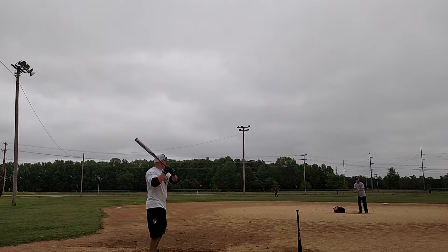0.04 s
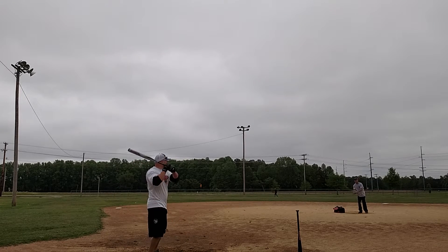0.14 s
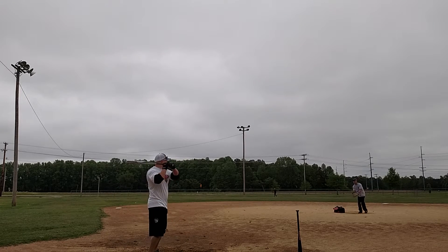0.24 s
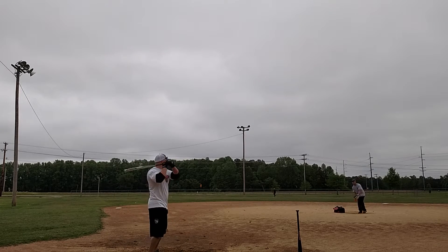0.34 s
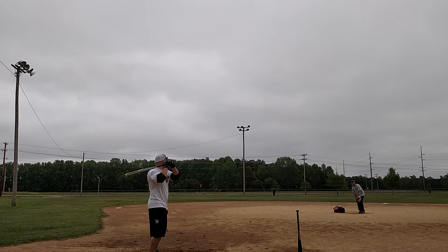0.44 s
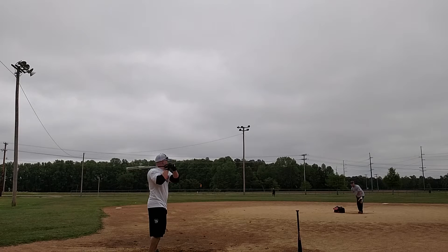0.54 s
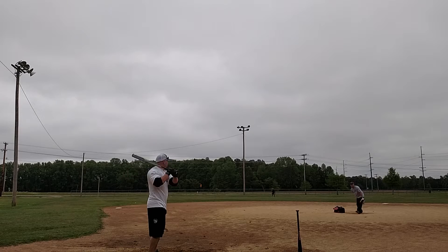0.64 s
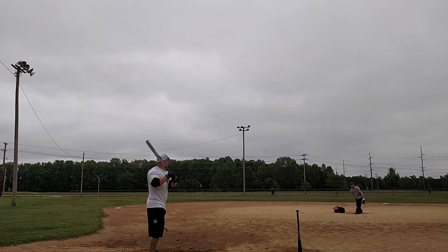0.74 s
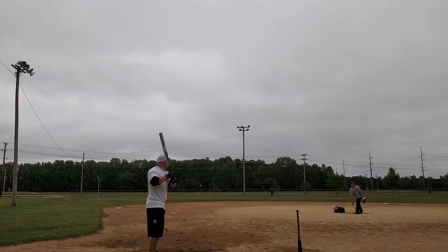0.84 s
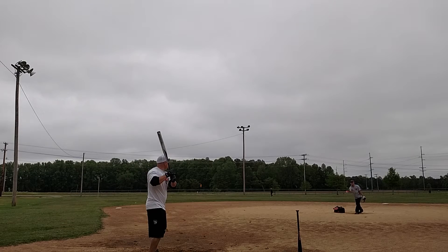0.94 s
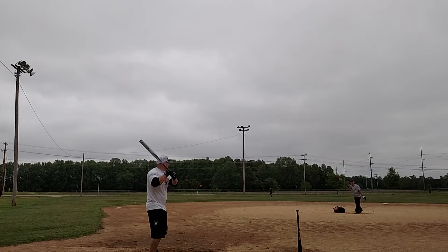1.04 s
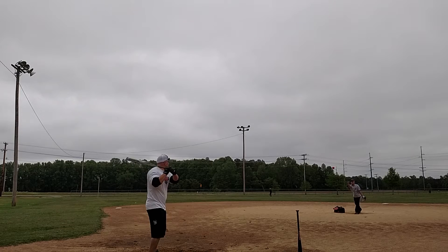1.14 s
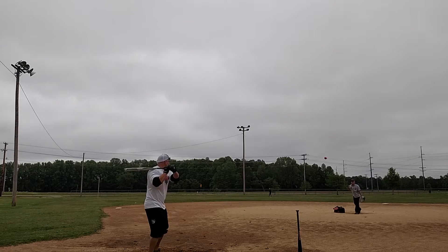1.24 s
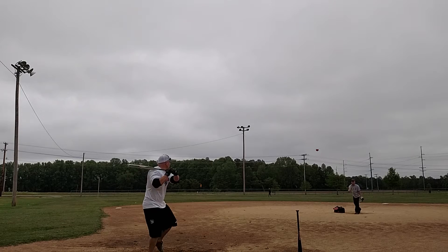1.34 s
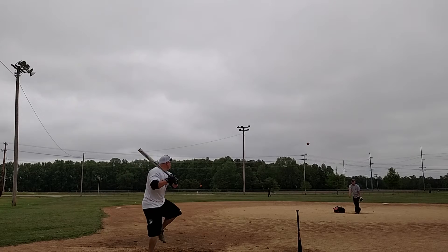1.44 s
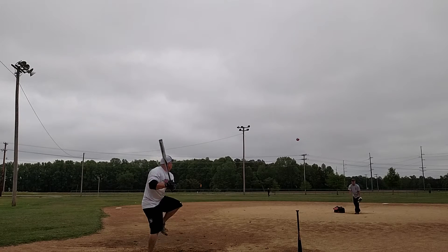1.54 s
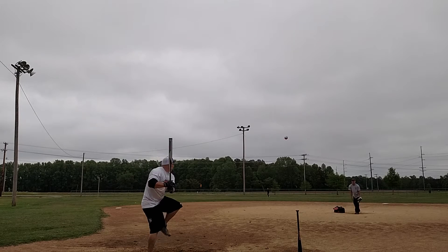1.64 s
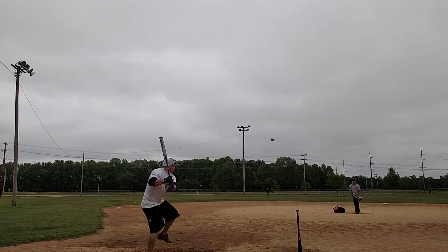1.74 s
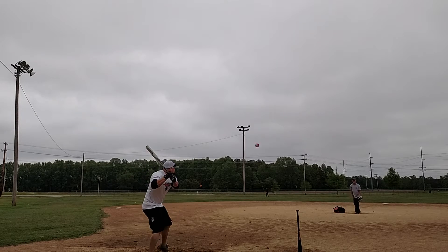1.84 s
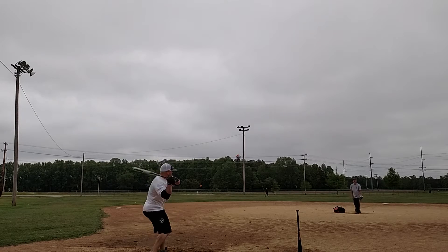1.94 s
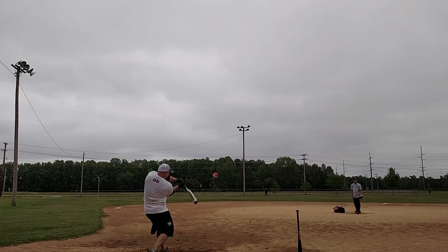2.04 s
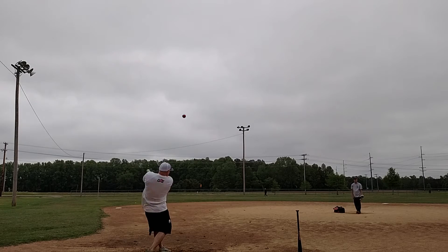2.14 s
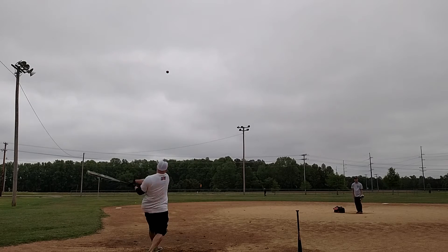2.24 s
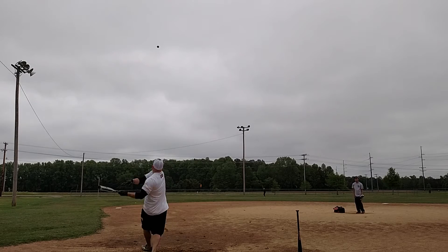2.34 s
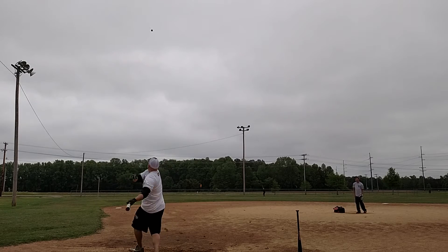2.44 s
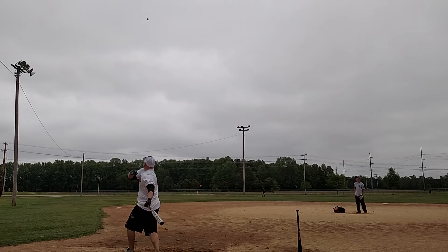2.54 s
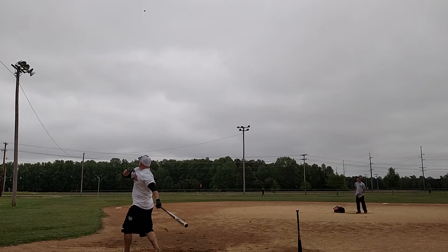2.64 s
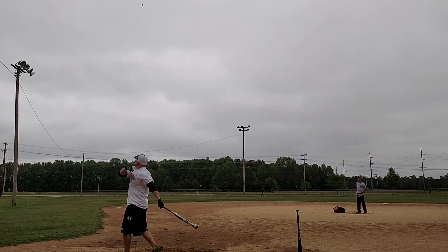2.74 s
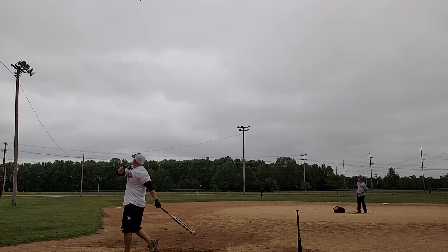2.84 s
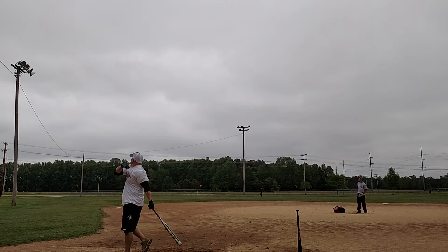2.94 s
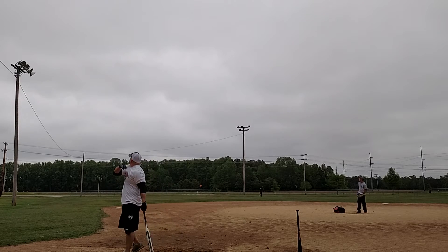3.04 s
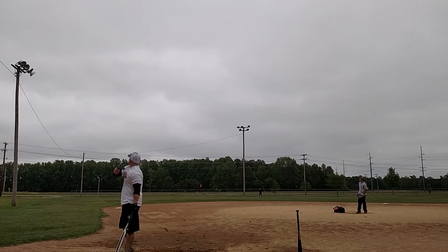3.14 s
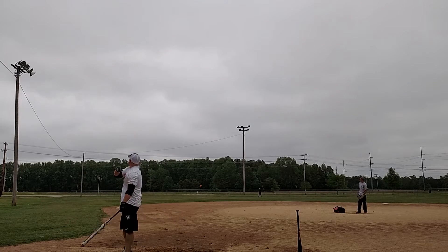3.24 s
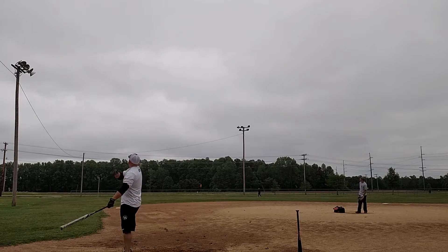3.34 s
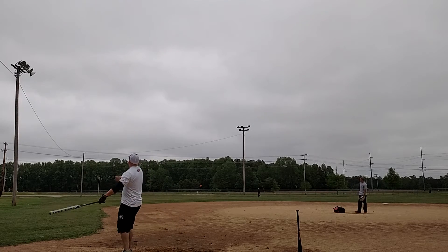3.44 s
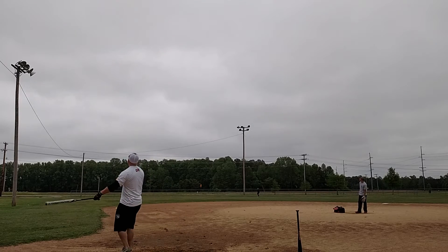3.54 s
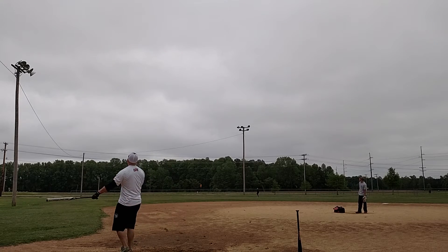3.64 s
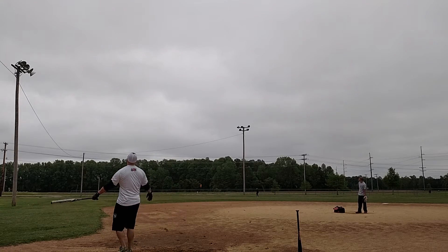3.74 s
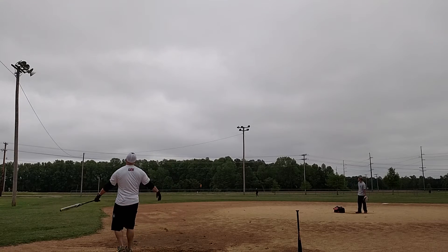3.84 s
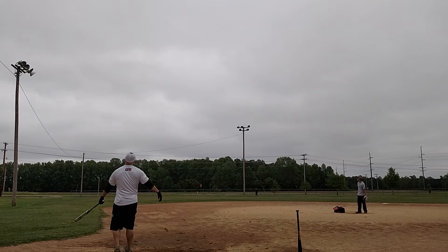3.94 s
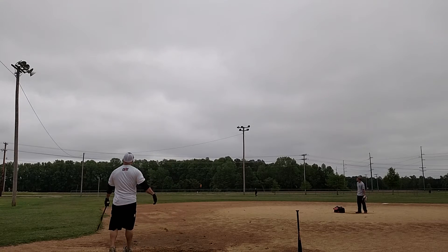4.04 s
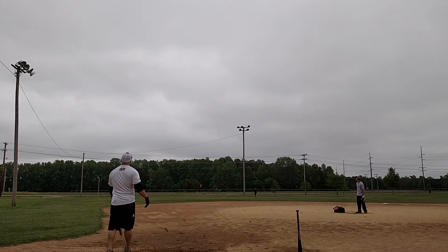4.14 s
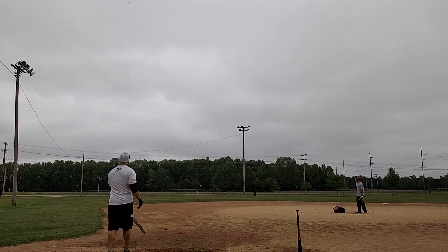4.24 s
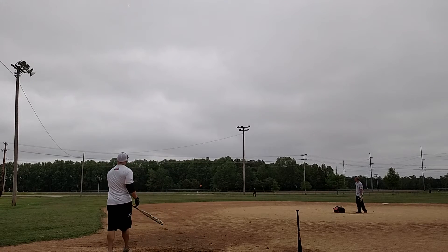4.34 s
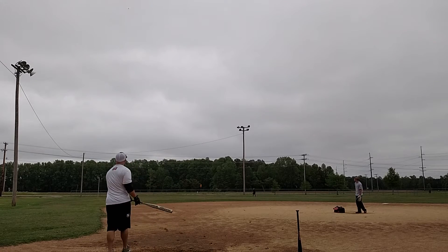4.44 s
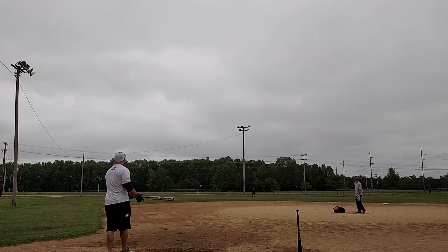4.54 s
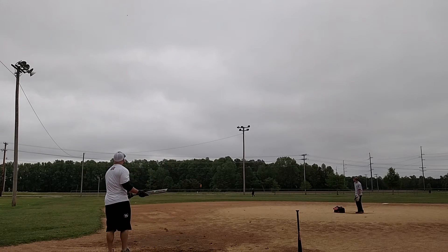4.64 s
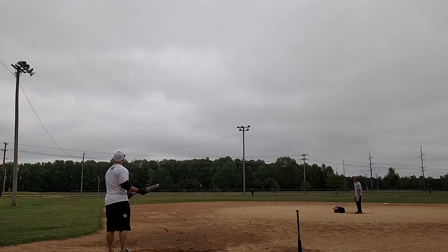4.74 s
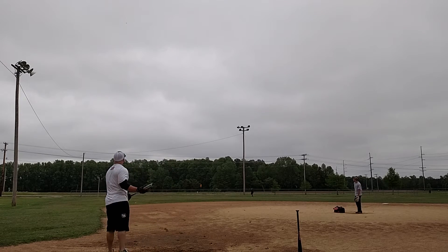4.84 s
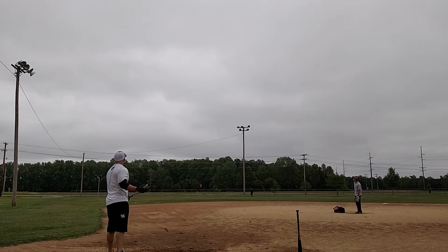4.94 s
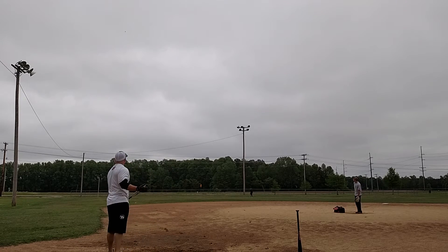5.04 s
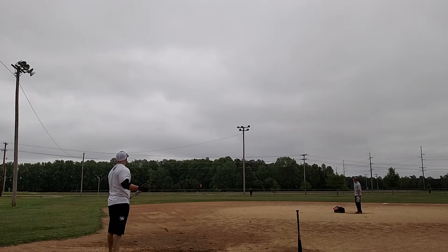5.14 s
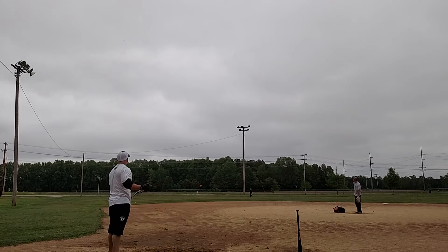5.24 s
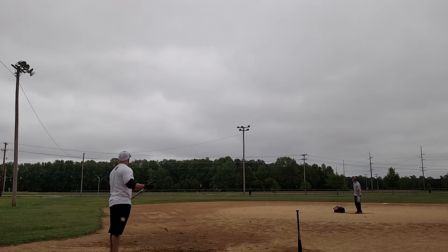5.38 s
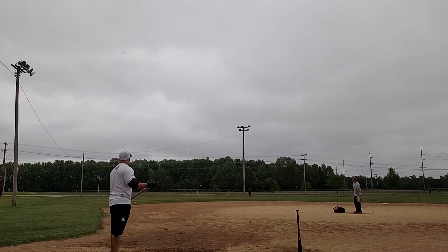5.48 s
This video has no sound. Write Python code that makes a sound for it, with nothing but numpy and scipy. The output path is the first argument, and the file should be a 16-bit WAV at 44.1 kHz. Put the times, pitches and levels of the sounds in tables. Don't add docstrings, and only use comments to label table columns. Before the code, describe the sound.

One sharp, overloaded bat crack on a softball rings over an open field, amid bird calls, foot scuffs in dirt and a low distant hum.

```python
import sys
import numpy as np
from scipy import signal
from scipy.fft import rfft, irfft
from scipy.io import wavfile
from scipy.ndimage import uniform_filter1d

SR = 44100
rng = np.random.default_rng(int(sys.argv[2]) if len(sys.argv) > 2 else 0)


def bounce(signal):
    frames = np.transpose(np.atleast_2d(signal))
    limited = np.clip(frames, -1, 1)
    pcm = np.round(limited * 32767).astype(np.int16)
    wavfile.write(sys.argv[1], SR, pcm)


def boost_factor(decibels):
    exponent = np.asarray(decibels, float) / 20
    return 10 ** exponent


N = 242991

# frequency in Hz, density in dB per Hz.
HUM_SPECTRUM = [(12, -34.5), (20, -7.5), (53, -5.5), (130, 0.5), (222, -0.5), (293, -5), (367, -11),
                (802, -19.5), (897, -18.5), (1480, -20.5), (1710, -22), (2200, -23.5), (4300, -32),
                (14700, -46), (16000, -55.5)]
HUM_DB = -50.5

# start in seconds, length in seconds, start pitch in Hz, level in dB.
RISING_NOTES = [(.149, 0.052, 2180, -62.5), (.393, 0.028, 1980, -65), (.532, 0.031, 1950, -62.5),
                (.678, 0.026, 2030, -63), (.738, 0.039, 2330, -71), (.834, .022, 2010, -66),
                (.972, 0.02, 1990, -65), (1.31, .024, 2330, -64), (1.112, .022, 1930, -64),
                (1.56, 0.14, 1600, -69), (5.236, 0.028, 2340, -68), (5.474, 0.021, 2310, -63)]
FALLING_NOTES = [(.066, .03, 1960, -65), (.172, 0.018, 2400, -66), (.204, 0.021, 2260, -64),
                 (.346, 0.026, 1950, -62), (.556, .03, 2950, -69), (.626, 0.027, 1990, -61),
                 (.7, 0.034, 2900, -68), (.804, .018, 2050, -64), (1.13, 0.02, 2300, -65),
                 (2.885, .035, 2580, -71), (3.125, 0.0286, 2600, -73), (3.153, .03, 2850, -80),
                 (4.686, 0.039, 3020, -68), (4.913, .043, 2900, -67), (5.262, 0.015, 2550, -73),
                 (5.325, 0.042, 2990, -65), (5.484, 0.03, 2760, -59)]
HOOKED_NOTES = [(.47, 0.025, 2760, -66), (.858, .022, 3200, -70), (1.262, 0.046, 2910, -64),
                (1.422, 0.039, 3000, -61), (1.572, 0.046, 3000, -60.5), (1.735, .04, 2990, -62),
                (1.905, 0.042, 3130, -66), (3.09, .05, 3230, -69), (3.35, .03, 3260, -65)]
SWOOPING_NOTES = [
    (.163, 0.113, 5800, -59),
    (.718, 0.108, 5700, -57.5),
    (1.248, 0.113, 5880, -55),
]
CLIMBING_NOTES = [
    (1.36, 0.12, 2520, -56.5),
    (1.7, 0.139, 2500, -57),
    (3.035, 0.053, 2110, -67),
    (1.483, 0.047, 4400, -69.5),
]
ARCHED_NOTES = [
    (1.553, 0.066, 4650, -71.5),
]
# start in seconds, length in seconds, start pitch in Hz, end pitch in Hz, level in dB.
PEEPS = [(0, 0.071, 1880, 2070, -68), (.075, .028, 2730, 2700, -63), (.423, .02, 2760, 2560, -71),
         (0.568, .035, 1970, 1940, -70), (0.617, 0.032, 2610, 2720, -65), (0.709, .024, 6780, 6520, -72),
         (0.73, 0.029, 6730, 6740, -75), (0.768, .042, 2150, 2030, -64), (.99, .014, 2200, 2050, -66),
         (0.994, 0.027, 2960, 2600, -68), (1.06, 0.053, 1715, 1960, -69), (1.13, .012, 3250, 3400, -70),
         (1.157, 0.032, 2595, 2690, -65), (1.557, 0.036, 4520, 4310, -75), (1.815, .04, 4370, 4530, -76),
         (3.296, 0.051, 2256, 2290, -70.5), (3.4, .085, 3640, 3490, -77), (3.512, .012, 3400, 3520, -67),
         (3.806, 0.044, 7170, 7190, -72.5), (3.811, .012, 4900, 4710, -70.5),
         (3.827, 0.035, 2850, 2850, -63.5), (3.858, .03, 2850, 2830, -71), (4.142, .025, 4960, 5050, -71),
         (4.368, .025, 4900, 4770, -65), (4.5, 0.077, 2370, 2340, -74), (4.866, 0.048, 2650, 2750, -71),
         (4.875, .025, 1700, 1600, -67), (5.03, 0.038, 2000, 2085, -72), (5.271, 0.04, 2090, 2150, -67.5),
         (5.362, .022, 1900, 1930, -73)]
# end pitch over start pitch, late start of glide, levelling out, swell in dB.
RISING = (1.26, 1.2, 1.05, .3)
FALLING = (.8, .95, 1.09, .3)
HOOKED = (0.715, 2.6, 1.5, 0.5)
SWOOPING = (.635, 1.65, 2.6, 22.)
CLIMBING = (1.085, .9, 2.3, 9)
ARCHED = (1.125, .9, 5., -3.)
NOTE_EDGE = 0.49
WARBLE_DB, WARBLE_SHARE = 1.8, 0.004

# share of length, pitch ratio, level in dB, pitch blur in Hz, overtones in dB.
CRY_COURSE = [
    (0, .985, -21, 39.9, -12),
    (.12, 1.005, -10.5, 39.88, -8),
    (.35, 1.012, -10, 44.93, -10),
    (.58, .995, -2.5, 110, -13),
    (.78, .97, -1.5, 160, -11),
    (1, .9, -9, 240, -16),
]
# start in seconds, length in seconds, pitch in Hz, level in dB, hoarseness factor.
CRIES = [
    (-.36, 0.56, 3400, -63.5, 0.7),
    (1.442, 0.55, 3502, -59, 1.48),
    (3.58, 0.52, 3380, -62, 1.0),
    (4.039, 0.53, 3390, -61.5, 1.04),
    (4.42, 0.36, 3350, -68, 1.12),
    (4.78, 0.37, 3404, -63.5, 1.25),
]
# multiple of the pitch, level in dB.
CRY_OVERTONES = [(1.5, -5.5), (2, -6), (2.5, -13.5)]

CHORUS_DB, CHORUS_HZ, CHORUS_SPREAD, CHORUS_S, CHORUS_NOTES = -77, 2450, 0.16, 0.045, 44

# time in seconds, peak in dB, length in seconds.
GUSTS = [
    (0.212, -44, 0.0049),
    (0.273, -42, 0.0094),
    (0.988, -29, 0.0034),
    (1.728, -41, 0.0059),
    (1.885, -42, 0.0047),
    (1.992, -40, 0.0035),
]

# start in seconds, length in seconds, first level in dB, last level in dB, brightness in dB per octave.
SCUFFS = [(0.465, 0.031, -59, -69, -2.5), (0.856, 0.039, -52.5, -64, -5), (1.38, 0.03, -70, -66, 10.5),
          (1.761, 0.064, -64, -62, -1), (2.732, 0.012, -52, -45.5, -1), (2.761, 0.036, -65, -58, -5),
          (3.315, .035, -54, -66, -4.5), (3.487, .09, -55.5, -67, -1.5), (3.59, 0.047, -65, -70, 4),
          (4.103, 0.08, -67, -62, 1.5), (4.191, 0.173, -56, -56.5, 1), (4.381, 0.15, -62, -62, 0.5),
          (4.866, 0.029, -63, -59, -3), (4.901, 0.27, -68, -66, 5.5), (5.167, 0.044, -71, -58, 0.5),
          (5.199, 0.31, -64.5, -68, 1.8)]
# start in seconds, length in seconds, first level in dB, last level in dB, brightness in dB per octave.
STRIDES = [(2.005, 0.052, -50, -49.5, 0.5), (2.06, 0.041, -58, -54.5, -0.5),
           (2.087, 0.014, -52, -42.5, -1.5), (2.106, .018, -45, -44.5, .5), (2.134, 0.024, -59, -57, 0.5),
           (2.152, 0.053, -47.5, -48, .6), (2.205, 0.026, -46, -37, -2.5), (2.243, .085, -46, -55, .5),
           (2.33, 0.39, -63, -68.5, 0), (2.399, 0.041, -51, -59.5, -0.5), (2.436, 0.19, -58, -62, -3)]
# frequency in Hz, density in dB per Hz.
DIRT_SPECTRUM = [(150, -36), (250, -1), (407, -11), (971, -7), (1530, -6), (1700, -8.5), (2620, -6),
                 (11100, -25.5), (14400, -36), (16000, -43.5)]
SET_S, LIFT_S, EDGE_DB = 0.012, 0.021, -10.5

# time in seconds, peak in dB, ring in Hz.
GRIT = [(1.133, -58, 6700), (1.227, -56, 5000), (2.256, -41, 8200), (2.2664, -40, 8400),
        (2.2774, -43, 6500), (2.2972, -31.5, 3800), (2.305, -40, 5450), (2.3114, -40, 5540),
        (2.319, -47, 7500), (2.3441, -43, 3670), (2.4025, -49, 5200), (2.7275, -44, 3865),
        (2.7725, -48, 3587), (3.489, -48, 5010), (3.601, -51, 4170), (3.6296, -47, 5270),
        (3.8144, -59, 4840), (4.0114, -51, 4830), (4.1203, -49, 5100), (4.509, -52, 3480),
        (4.561, -50, 4900), (4.6637, -47, 4940), (5.101, -47, 3050), (5.1624, -44, 4100),
        (5.166, -45, 4900), (5.2041, -46, 3470), (5.2842, -48, 5460), (5.3456, -46.5, 5320)]

# time in seconds, centre in Hz, level in dB.
SWING_COURSE = [
    (2.1, 60, -55),
    (2.17, 91, -56),
    (2.203, 170, -42),
    (2.222, 230, -46),
    (2.24, 260, -60),
]

HIT_S, HIT_DB, TICK_DB, PUFF_DB = 2.2261, 2.2, 3.5, -23
# frequency in Hz, level in dB, decay by 60 dB in seconds, start as push (1) or pull (-1).
BARREL_MODES = [(670, -10, 0.018, 1), (840, -18, 0.012, -1), (935.5, -22, 0.018, -1),
                (1075, -11.5, 0.043, -1), (1250, -14, 0.018, -1), (1520, -9, 0.0094, -1),
                (1868, 2.5, 0.0074, 1), (2130, -12.5, 0.026, -1), (3000, -19, 0.021, 1),
                (3520, -5, .0105, -1), (4490, -18.5, 0.0064, 1), (4976, -9.5, 0.0069, -1),
                (6350, -15, 0.0075, 1), (7270, -22.5, 0.0066, 1)]
THIN_HZ = 527
# delay in seconds, level in dB.
BOUNCES = [
    (.0022, -20),
    (.0066, -25),
    (.009, -22),
]
BOUNCE_HZ = 2800
# delay in seconds, level in dB, spread in seconds.
ECHOES = [
    (.028, -35, 0.0091),
    (.05, -35.5, 0.011),
    (.095, -39, 0.0083),
    (0.173, -46.5, 0.015),
    (.25, -37.5, .05),
    (.51, -37, 0.017),
]
# frequency in Hz, level in dB.
ECHO_COLOUR = [(300, -13.5), (1000, -2), (1180, 5), (1400, -4.5), (3000, -6), (8000, -13), (16000, -22.5)]
# delay in seconds, frequency in Hz, level in dB, length in seconds.
POSTS = [
    (0.036, 1165, -43, .0045),
    (0.052, 731, -46, .003),
    (0.073, 710, -45, 0.003),
    (.065, 1201, -54, .025),
    (0.094, 1200, -44.5, 0.006),
    (.106, 1170, -49, .007),
    (0.173, 1190, -54, .012),
    (0.266, 1156, -63, .03),
]

# time in seconds, level in dB.
INSECT_COURSE = [
    (3.58, -78),
    (3.76, -74),
    (3.88, -68.5),
    (4.25, -66.5),
    (5.51, -65.5),
]
BEAT_PER_S, MIDWAY_S, AHEAD, SLOWING = 32.3, 4.62, 0.14, 0.9

# time in seconds, level in dB.
CLOTH_COURSE = [
    (4.88, -82),
    (4.96, -70),
    (5.05, -69),
    (5.11, -70),
    (5.2, -82),
]
# frequency in Hz, level in dB.
CLOTH_COLOUR = [(5000, -25), (8000, -3), (10000, 0), (13000, -5), (15500, -6)]

# frequency in Hz, level in dB.
MIC_RESPONSE = [(10, -3), (60, 0), (14000, 0.5), (15450, 0.5), (15650, -25.5), (20000, -42)]
# frequency in Hz, share of the ducking from 0 to 1.
DUCK_SHARE = [(30, 1.02), (250, 1), (600, 0.5), (2000, .35), (6000, 0.2), (14000, 0.3)]
DUCK_DB, GRAB_S, RECOVER_S = -17.5, 0.035, 1.95


def evened(x):
    return x / np.sqrt(np.mean(x ** 2) + 1e-20)


def wander(count, size):
    return evened(uniform_filter1d(rng.standard_normal(count), size=size))


def patches(shape, bands, frames):
    across = uniform_filter1d(rng.standard_normal(shape), size=bands, axis=0)
    return evened(uniform_filter1d(across, size=frames, axis=1))


def read(points, hz):
    f, value = np.transpose(points)
    return np.interp(np.log(hz + 1), np.log(f + 1), value)


def unroll(rows):
    s, *columns = np.transpose(rows)
    t = np.arange(s[0], s[-1], 1 / SR)
    return [t] + [np.interp(t, s, c) for c in columns]


def add(mix, s, sound):
    at = round(s * SR)
    part = mix[max(at, 0):][:len(sound) + min(at, 0)]
    part += sound[max(-at, 0):][:len(part)]


def resonate(x, hz, width):
    turn = np.exp(2j * np.pi * np.cumsum(hz * np.ones(len(x))) / SR)
    r = np.exp(-np.pi * width / SR)
    return 2 * (turn * signal.lfilter([1 - r], [1, -r], x / turn)).real


def coloured(x, points):
    return irfft(rfft(x) * boost_factor(read(points, np.fft.rfftfreq(len(x), 1 / SR))), len(x))


def high_passed(x, hz):
    return signal.sosfilt(signal.butter(2, hz, "high", fs=SR, output="sos"), x)


def field():
    hz, _, z = signal.stft(rng.standard_normal(N), SR, nperseg=1024, noverlap=768)
    z = z * boost_factor(read(HUM_SPECTRUM, hz)[:, None] + 0.96 * patches(z.shape, 8, 10))
    return boost_factor(HUM_DB) * evened(signal.istft(z, SR, nperseg=1024, noverlap=768)[1][:N])


def trees(x, wet_db=-7.5, t60=0.24):
    t = np.arange(9000) / SR
    tail = rng.standard_normal(len(t)) * boost_factor(-60 * t / t60)
    return x + boost_factor(wet_db) * signal.oaconvolve(x, tail / np.linalg.norm(tail))[:N]


def note(s, length, start_hz, db, ratio, late, level_out, swell_db):
    u = np.linspace(0, 1, round(length * SR))
    rate, shift = rng.random((2, 2, 1))
    sway, wobble = np.sin(2 * np.pi * ((40 + 60 * rate) * u * length + shift))
    glide = 1 - (1 - u ** late) ** level_out
    hz = start_hz * (1 + (ratio - 1) * glide + WARBLE_SHARE * wobble)
    level = boost_factor(db + 6.0 - swell_db * (1 - u) + WARBLE_DB * sway)
    return s, level * np.sin(2 * np.pi * np.cumsum(hz) / SR) * signal.windows.tukey(len(u), NOTE_EDGE)


def cry(s, length, pitch_hz, cry_db, hoarse):
    t, hz, db, blur, over_db = unroll([
        (s + u * length, pitch_hz * ratio ** hoarse, cry_db + d, hoarse * blur, over)
        for u, ratio, d, blur, over in CRY_COURSE])
    turns = 2 * np.pi * np.cumsum(hz + 0.63 * blur * wander(len(t), 200)) / SR
    flutter = boost_factor(2.4 * wander(len(t), 600))
    overtones = sum(boost_factor(d) * np.sin(k * turns) for k, d in CRY_OVERTONES)
    return t[0], boost_factor(db + 1) * (np.sin(turns) + boost_factor(over_db) * overtones) * flutter


def birds():
    near, far = np.zeros((2, N))
    for rows, shape in [(RISING_NOTES, RISING), (FALLING_NOTES, FALLING), (HOOKED_NOTES, HOOKED),
                        (SWOOPING_NOTES, SWOOPING), (CLIMBING_NOTES, CLIMBING), (ARCHED_NOTES, ARCHED)]:
        for row in rows:
            add(near, *note(*row, *shape))
    for s, length, start_hz, end_hz, db in PEEPS:
        add(near, *note(s, length, start_hz, db, end_hz / start_hz, 1, 0.89, 0))
    for row in CRIES:
        add(far, *cry(*row))
    return trees(near) + boost_factor(-1.5) * trees(far, wet_db=2.0, t60=0.68)


def chorus():
    out = np.zeros(N)
    for when, pitch, way, size in rng.random((CHORUS_NOTES, 4)):
        ratio, *shape = RISING if way < 0.5 else FALLING
        hz = CHORUS_HZ * (1 + CHORUS_SPREAD * (2 * pitch - 1)) / np.sqrt(ratio)
        length = CHORUS_S * (0.6 + size)
        add(out, *note(when * N / SR, length, hz, CHORUS_DB + 4.0 * size, ratio, *shape))
    return trees(out, wet_db=-1.5, t60=0.49)


def gusts(mix):
    for s, db, length in GUSTS:
        u = np.arange(-0.05 * SR, 0.05 * SR) / SR / length
        add(mix, s - 0.05, -boost_factor(db) * (1 - u ** 2) * np.exp(-u ** 2 / 2))


def scuff(s, length, first_db, last_db, brightness):
    end = s + length
    t, db, tilt = unroll([(s - SET_S, first_db + EDGE_DB, brightness), (s, first_db, brightness),
                          (end, last_db, brightness), (end + LIFT_S, last_db + EDGE_DB, brightness)])
    sand = rng.standard_normal(len(t)) * boost_factor(wander(len(t), 120))
    hz, frames, z = signal.stft(coloured(sand, DIRT_SPECTRUM), SR, nperseg=256)
    octaves = np.log2((hz[:, None] + 200) / 2500)
    z = z * boost_factor(octaves * np.interp(frames, t - t[0], tilt))
    slide = evened(signal.istft(z, SR, nperseg=256)[1][:len(t)])
    return t[0], boost_factor(db) * slide * signal.windows.tukey(len(t), 0.08)


def grit(mix):
    t = np.arange(300) / SR
    tick = boost_factor(-7.0) * np.sin(2 * np.pi * 7500 * t) * boost_factor(-60 * t / 0.0013)
    envelope = boost_factor(-60 * t / 0.0035) * (1 - np.exp(-t / 0.0001))
    for s, db, hz in GRIT:
        add(mix, s, boost_factor(db + 3.5) * (tick + np.sin(2 * np.pi * hz * t) * envelope))


def swing():
    t, hz, db = unroll(SWING_COURSE)
    return t[0], boost_factor(db) * evened(resonate(rng.standard_normal(len(t)), hz, 37.0))


def impact(t):
    ring = sum(np.sign(way) * boost_factor(db - 60 * t / t60) * np.sin(2 * np.pi * hz * t)
               for hz, db, t60, way in BARREL_MODES)
    tick = boost_factor(TICK_DB) * np.sin(2 * np.pi * 3800 * t + 0.28) * np.exp(-t / 0.00011)
    skin = boost_factor(-7.0) * np.sin(2 * np.pi * 10500 * t) * boost_factor(-60 * t / 0.00097)
    puff = boost_factor(PUFF_DB - 60 * t / 0.029) * evened(coloured(rng.standard_normal(len(t)), DIRT_SPECTRUM))
    return high_passed(ring * (1 - np.exp(-t / 0.00012)) + tick + skin + puff, THIN_HZ)


def crack():
    t = np.arange(round(0.7 * SR)) / SR
    direct = impact(t)
    treble = high_passed(direct, BOUNCE_HZ)
    for delay, db in BOUNCES:
        add(direct, delay, boost_factor(db) * treble)
    density = sum(boost_factor(db) * np.exp(-((t - delay) / spread) ** 2) / np.sqrt(spread * SR)
                  for delay, db, spread in ECHOES)
    scatter = rng.standard_normal(len(t)) * density
    posts = sum(boost_factor(db) * np.exp(-((t - delay) / length) ** 2) * np.sin(2 * np.pi * hz * t)
                for delay, hz, db, length in POSTS)
    echoes = coloured(signal.fftconvolve(direct, scatter)[:len(t)], ECHO_COLOUR)
    return HIT_S, boost_factor(HIT_DB) * (direct + posts + echoes)


def insect():
    t, db = unroll(INSECT_COURSE)
    beats = BEAT_PER_S * t + AHEAD - SLOWING * (t - MIDWAY_S) ** 2
    stroke = (beats + 0.5) % 1 - 0.5
    teeth = np.diff(np.floor(10 * stroke), prepend=0) > 0
    swell = np.exp(-(stroke / 0.12) ** 2)
    clicks = teeth * (0.25 + swell) * rng.uniform(0.58, 0.99, len(t))
    rasp = 0.075 * (0.5 + swell) * rng.standard_normal(len(t))
    wing = resonate(clicks + rasp, 6750 + 210.0 * np.sin(2 * np.pi * stroke), 850.0)
    band = signal.butter(4, (5950, 7550), "band", fs=SR, output="sos")
    return t[0], boost_factor(db) * evened(signal.sosfilt(band, wing))


def cloth():
    t, db = unroll(CLOTH_COURSE)
    hiss = coloured(rng.standard_normal(len(t)), CLOTH_COLOUR)
    _, frames, z = signal.stft(hiss, SR, nperseg=256)
    catches = 2.5 * np.sin(2 * np.pi * 32 * frames)
    z = z * boost_factor(3.0 * patches(z.shape, 3, 25) + catches)
    return t[0], boost_factor(db) * evened(signal.istft(z, SR, nperseg=256)[1][:len(t)])


def scene():
    mix = field() + birds() + chorus()
    gusts(mix)
    grit(mix)
    for row in SCUFFS + STRIDES:
        add(mix, *scuff(*row))
    for source in (swing, crack, insect, cloth):
        add(mix, *source())
    return mix[None]


def low_pass(x):
    return signal.sosfilt(signal.butter(12, 16230, fs=SR, output="sos"), x)


def record(dry):
    hz, t, z = signal.stft(np.clip(dry, -1, 1), SR, nperseg=512, noverlap=384)
    since = np.maximum(t - HIT_S - 0.01, 0)
    duck_db = DUCK_DB * (1 - np.exp(-since / GRAB_S)) * np.maximum(1 - since / RECOVER_S, 0)
    z = z * boost_factor(read(DUCK_SHARE, hz)[:, None] * duck_db + read(MIC_RESPONSE, hz)[:, None])
    return low_pass(signal.istft(z, SR, nperseg=512, noverlap=384)[1][:, :N])


dry = scene()
out = record(dry)
bounce(out)
```